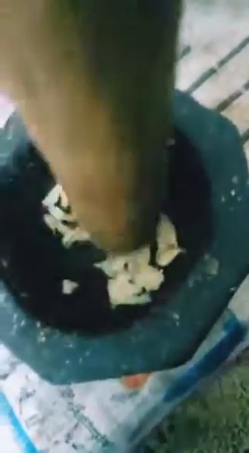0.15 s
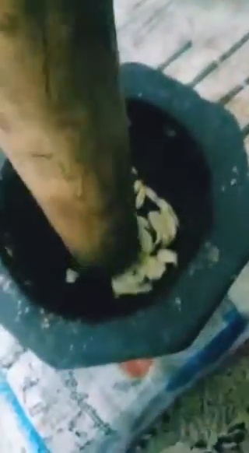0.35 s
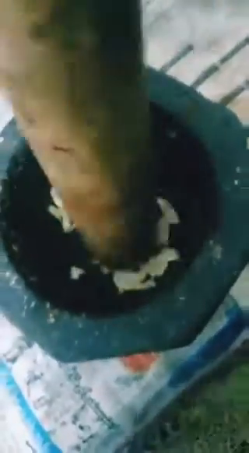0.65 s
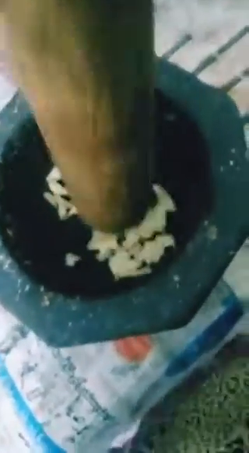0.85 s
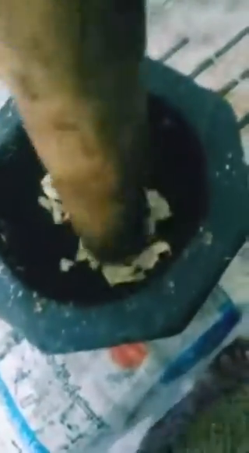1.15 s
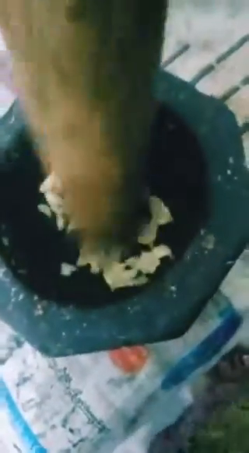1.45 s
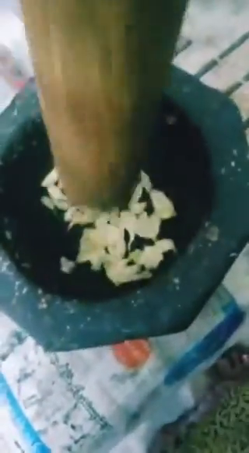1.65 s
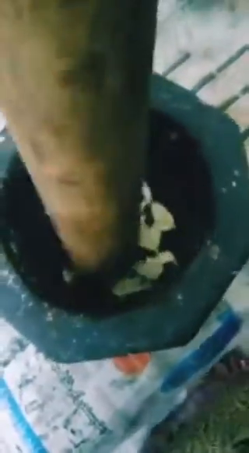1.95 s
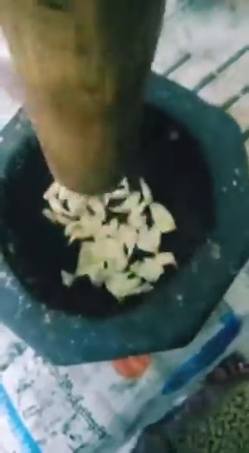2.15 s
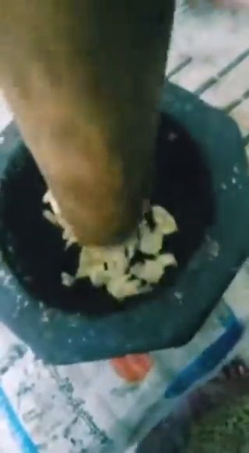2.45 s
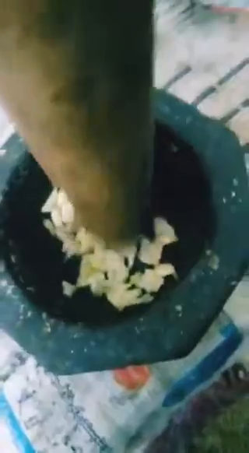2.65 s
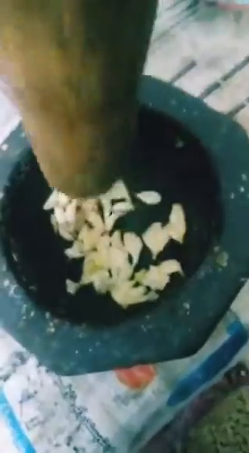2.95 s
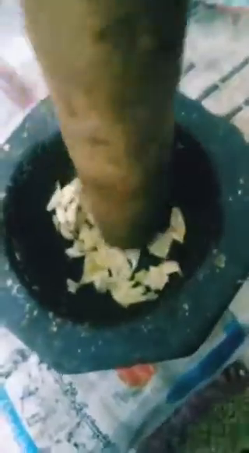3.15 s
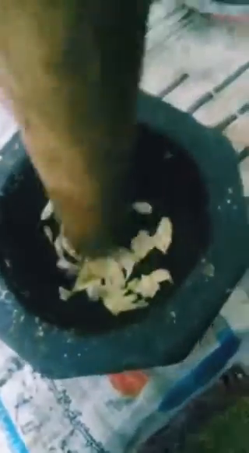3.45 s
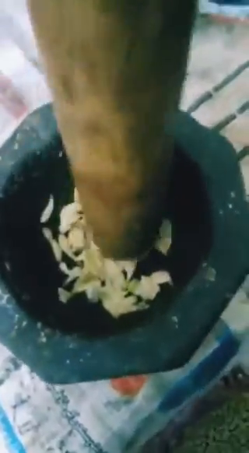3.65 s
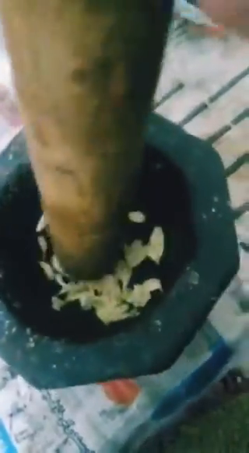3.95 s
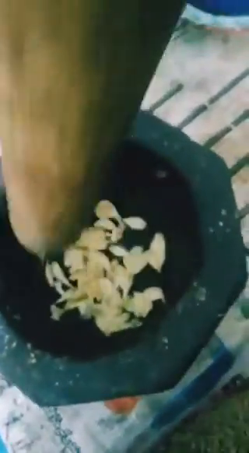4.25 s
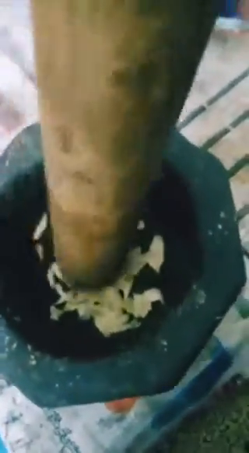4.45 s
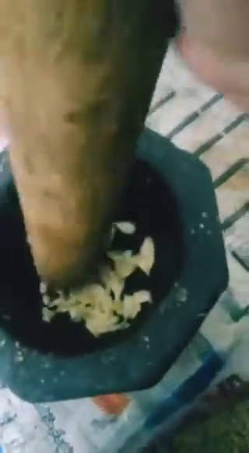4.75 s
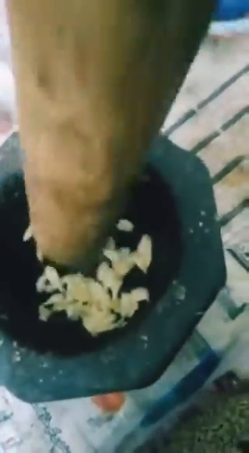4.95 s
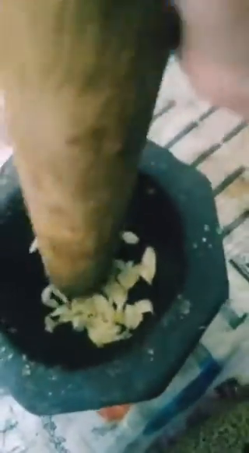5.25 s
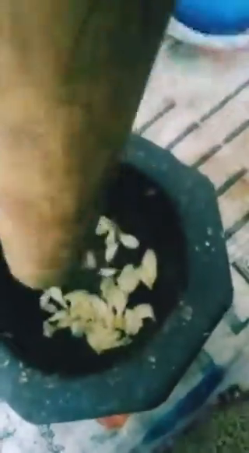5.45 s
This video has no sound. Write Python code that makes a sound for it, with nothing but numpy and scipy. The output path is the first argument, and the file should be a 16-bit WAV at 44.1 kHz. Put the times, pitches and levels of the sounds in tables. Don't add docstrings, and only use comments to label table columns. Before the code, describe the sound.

Steady low thumps of wood crushing garlic in a heavy stone bowl, with rumbling floor, faint metal ringing and soft pan hiss.

```python
import sys
import numpy as np
from scipy import signal
from scipy.io import wavfile
from scipy.ndimage import uniform_filter1d, minimum_filter1d

SR = 44100
rng = np.random.default_rng(int(sys.argv[2]) if len(sys.argv) > 2 else 0)


def voltage_ratio(decibels):
    exponent = np.asarray(decibels, float) / 20
    return 10 ** exponent


def unload_wav(signal):
    wavfile.write(
        sys.argv[1],
        SR,
        np.round(np.clip(np.atleast_2d(signal).T, -1, 1) * 32767).astype(np.int16),
    )


N = 246519

# t/s, thud peak level/dB, crunch level/dB, contact level/dB, rumble
# level/dB
PESTLE_BLOWS = [
    (-.05, -14, -40, -40, -24),
    (1.988, -26, -36, -70, -25),
                (0.359, -17.5, -16, -36, -28.5), (0.77, -13, -22, -31, -26), (1.184, -17, -15, -26, -28),
         (1.575, -25, -21, -32, -26.5), (2.398, -9.5, -14, -21, -23), (2.817, -9.5, -10, -17, -21),
         (3.22, -32, -12.5, -29.5, -39), (3.634, -19, -19, -20.5, -24.5), (4.046, -16, -14, -20.5, -23.5),
         (4.465, -10, -14, -18.5, -22), (4.882, -10, -15.5, -17.5, -22), (5.288, -16.5, -16, -22, -25)]
# t/s, peak level/dB
BARE_KNOCK = (1.9896, -.6)
# f/Hz, level/dB, t60/s
PESTLE_MODES = [(895, 0, .09), (975, -4.5, .09), (1500, -4, .014), (2000, -2, .014), (2500, -6, .01)]
# f/Hz, width/Hz, level/dB
SLAT_MODES = [(252, 28, -6.5), (354, 48, 5), (415, 37, 4.5), (425, 30, -26.5), (744, 14, -36)]
# f/Hz, level/dB per Hz
RUMBLE_SPECTRUM = [(24, -65), (40, -33.5), (223, 6.5), (369, -3), (437, 1), (516, 0), (664, -2.5), (753, 0),
                   (1050, -8), (2020, -11), (2240, -11.5), (3950, -22), (6000, -24), (7800, -52),
                   (13200, -120)]
# f/Hz, t60/s
KITCHEN_DECAY = [(100, 0.66), (300, 0.8), (600, 0.65), (1200, 0.78), (3000, 0.97), (8000, 0.71)]
# f/Hz, likeness/1
RUMBLE_SAME = [(60, .97), (150, 0.97), (450, 0.82), (950, 0.13), (2380, 0.01), (5980, 0.03), (15000, 0.44)]
# f/Hz, level/dB
RUMBLE_LEAN = [(60, 3), (180, -0.5), (550, 2.5), (1650, 4), (4970, -2), (15000, -20)]
# t/s, f/Hz, level/dB
LOOSE_SLAT = [(0, 439, -23), (0.401, 415, -25), (.8, 415, -27.5), (1.221, 415, -24), (1.599, 415, -19),
              (2.439, 453, -21.5), (3.67, 415, -23.5), (4.08, 387, -23.5), (4.499, 415, -27),
              (5.319, 415, -35)]
# t/s, peak level/dB, t60/s
RUSTLES = [(0.5311, -21, 0.32), (1.035, -23, 0.39), (1.4456, -35, 0.23), (3.0705, -23, 0.18)]
# t/s, held/s, level/dB
DISH_SPELLS = [(0.54, .03, -39), (0.84, 0.07, -31), (1.455, .012, -32.5), (1.61, 0.028, -34),
               (1.69, 0.035, -32.5), (2.09, 0.045, -36), (2.17, .19, -27.5), (3.065, 0.052, -35),
               (3.17, .13, -33.5), (3.461, 0.043, -27.5), (3.72, .012, -31), (3.905, 0.058, -32),
               (4.685, .012, -30)]
# t/s, swell level/dB
PAN_SWELL = [(0.0, -0.5), (0.4, 0), (0.95, -1), (1.4, -0.7), (1.66, 3), (1.93, -2), (2.05, -2), (2.17, 1),
             (2.38, 4.5), (2.62, -1), (2.84, -0.4), (3.45, 3), (3.6, 2), (3.75, -0.5), (4.55, 0.3),
             (4.74, 1), (4.92, 0.1), (5.59, -1)]
# f/Hz, level/dB per Hz
HISS_SPECTRUM = [(18, -65), (30, -46), (76, -30), (135, -10.5), (223, -22), (298, -9), (368, -10),
                 (713, -10), (772, -6), (1530, -7.5), (4180, -2.5), (7670, -11), (11700, -13), (15200, -6),
                 (16500, -21.5)]
# f/Hz, likeness/1
HISS_SAME = [(60, 0.93), (150, 1), (380, 1), (950, -0.033), (2380, 0.046), (11000, -0.021), (15000, 0.56)]
# f/Hz, level/dB
HISS_LEAN = [(60, 3), (99, -2), (160, 0), (270, 0.0), (450, -1.5), (740, 1.5), (1220, 4), (2010, 2.5),
             (3330, -3), (5500, -5), (9080, -11.5), (15000, -6.5)]
# f/Hz, width/Hz, level/dB
PORT = (15350, 1200, -9)

SQUARE_HZ, GLANCING_HZ = 232, 340
SQUARE_RISE_S, GLANCING_RISE_S = 0.0058, 0.055
GLANCING_DB, GLANCING_SPAN_DB = -19, 1
DISH_HZ, DISH_RISE_S, DISH_FADE_DB_PER_S = 2586, 0.048, -260
HISS_DB, HISS_FOLLOW = 18.0, 1
SIZZLE_DB, SIZZLE_FOLLOW = 15.5, 1.27
LIMIT_DB, RECOVER_DB_PER_S = -14, 153
EDGE_HZ = 15880


def blows():
    out = np.zeros((2, N))
    for s, thud_db, crunch_db, contact_db, rumble_db in PESTLE_BLOWS:
        glance = 1 / (2.5 + np.exp((thud_db - GLANCING_DB) / GLANCING_SPAN_DB))
        thud_hz = SQUARE_HZ + glance * (GLANCING_HZ - SQUARE_HZ)
        rise_s = SQUARE_RISE_S + glance * (GLANCING_RISE_S - SQUARE_RISE_S)
        add(out, s - .020, crunch(crunch_db + 7.5))
        add(out, s - .001, contact(contact_db + 8.0))
        add(out, s, thud(thud_db + 2.5, thud_hz))
        add(out, s + 0.0055, rumble(rumble_db, rise_s))
    knock_s, knock_db = BARE_KNOCK
    add(out, knock_s, knock(knock_db))
    return out


def crunch(db):
    t = np.arange(-.02, .01, 1 / SR)
    shape = np.where(t < 0, np.exp(t / .0022), np.exp(-t / .0008))
    crackle = uniform_filter1d(rng.exponential(1, len(t)), size=12)
    noise = rng.standard_normal((2, len(t))) * crackle
    band = signal.butter(2, [1100, 12500], "bandpass", fs=SR, output="sos")
    burst = shape * signal.sosfilt(band, noise)
    return voltage_ratio(db) * voltage_ratio([[-3], [1.5]]) * burst / abs(burst).max()


def contact(db):
    t = np.arange(0, .03, 1 / SR)
    touch = 0.6 * ring(804, 0.015, t, 0.00041)
    late = np.maximum(t - .0125, 0)
    echo = sum(ring(hz * rng.uniform(0.976, 1.2), 0.017, late, 0.001) for hz in (760, 1530, 1904, 2600))
    return voltage_ratio(db) * (touch + voltage_ratio([[-1.5], [-5]]) * echo)


def thud(db, hz):
    t = np.arange(0, .04, 1 / SR) - .0052
    swing = np.exp(-(t / np.where(t < 0, .0017, .004)) ** 2)
    push = swing * np.cos(2 * np.pi * 1.2 * hz * (t - .0008))
    return voltage_ratio(db) * np.array([push, push])


def rumble(db, rise_s):
    pushes = rng.random((2, SR)) < 6000 / SR
    taps = rng.standard_normal((2, SR)) * pushes
    hz, t, z = pair(taps[0], taps[1], RUMBLE_SAME, RUMBLE_LEAN, size=1024)
    slats = voltage_ratio(read(RUMBLE_SPECTRUM, hz)) + sum(hump(hz, *mode) for mode in SLAT_MODES)
    decay = voltage_ratio(-60 * t / read(KITCHEN_DECAY, hz))
    tail = back(z * slats * decay, size=1024)[:, :SR]
    t = np.arange(SR) / SR
    far_wall = voltage_ratio(2.46 * np.exp(-((t - .075) / 0.044) ** 2))
    return voltage_ratio(db + 27.0) * tail * far_wall * (1 - np.exp(-(t / rise_s) ** 2))


def knock(db):
    t = np.arange(0, .08, 1 / SR)
    tone = sum(voltage_ratio(mode_db) * ring(hz, t60, t, .0004) for hz, mode_db, t60 in PESTLE_MODES)
    tone = -voltage_ratio(db) * tone / abs(tone).max()
    hz, t, z = pair(*rng.standard_normal((2, SR)), RUMBLE_SAME, RUMBLE_LEAN, size=1024)
    note = hump(hz, 950, 110, 1) + hump(hz, 990, 100, -2.7) + hump(hz, 920, 95, 0.5) + hump(hz, 787, 50, 0)
    room = back(z * note * voltage_ratio(-3.5 - 60 * t / 0.92), size=1024)[:, :SR]
    out = room * np.minimum(np.arange(SR) / SR / 0.007, 1)
    add(out, 0, np.array([np.roll(tone, 12), voltage_ratio(-1.5) * tone]))
    return out


def slat():
    out, t = np.zeros((2, N)), np.arange(SR // 2) / SR
    for s, hz, db in LOOSE_SLAT:
        shaking = rng.standard_normal(len(t) + 3000)
        note = signal.oaconvolve(shaking, ring(hz, 0.29, t[:3000], 0.0099), "valid")
        waver = evened(note[:len(t)])
        fade = voltage_ratio(db - 60 * t / 0.57) * (1 - np.exp(-t / 0.051))
        add(out, s, voltage_ratio([[.7], [-.7]]) * waver * fade)
    return out


def rustles():
    out, t = np.zeros((2, N)), np.arange(0, .2, 1 / SR)
    band = signal.butter(2, [1900, 3900], "bandpass", fs=SR, output="sos")
    for s, db, t60 in RUSTLES:
        grains = rng.standard_normal((2, len(t))) * (rng.random(len(t)) < 1500 / SR)
        add(out, s, voltage_ratio(db - 3.0 - 60 * t / t60) * evened(signal.sosfilt(band, grains)))
    return out


def dish():
    nudges = rng.standard_normal((3, N)) * (rng.random(N) < 400 / SR)
    at_ports = nudges[:1] + .8 * nudges[1:]
    mode = ring(DISH_HZ, .1, np.arange(8000) / SR, .002)
    tone = signal.oaconvolve(at_ports, mode[None])[:, :N]
    loud = np.sqrt(uniform_filter1d(tone ** 2, size=2500) + .3)
    level = sum(spell(*row) for row in DISH_SPELLS)
    throb = .65 + .35 * np.cos(2 * np.pi * 27 * np.arange(N) / SR)
    return uniform_filter1d(level, size=400) * throb * tone / loud


def spell(start, held, db):
    t = np.arange(N) / SR - start
    rise = np.clip(1 + t / DISH_RISE_S, 0, 1) ** 2
    return rise * voltage_ratio(db + DISH_FADE_DB_PER_S * np.maximum(t - held, 0))


def hiss():
    hz, t, z = pair(*rng.standard_normal((2, N + 1024)), HISS_SAME, HISS_LEAN, size=1024)
    drift = uniform_filter1d(rng.standard_normal(z.shape[1:]), 20, 0)
    patches = evened(uniform_filter1d(drift, 8, 1))
    flicker = evened(uniform_filter1d(rng.standard_normal(len(t)), 5)) * (hz > 1800) * 1.05
    swell_db = np.interp(t, *np.transpose(PAN_SWELL))
    colour = voltage_ratio(read(HISS_SPECTRUM, hz)) + hump(hz, *PORT) + hump(hz, 1973, 130, -13.5)
    wide = colour * voltage_ratio(HISS_DB + HISS_FOLLOW * swell_db)
    sizzle = hump(hz, 4020, 1700, SIZZLE_DB + SIZZLE_FOLLOW * swell_db)
    gain = np.hypot(wide, sizzle) * voltage_ratio(1.3 * patches + flicker)
    return voltage_ratio(-38.5) * back(z * gain, size=1024)[:, :N]


def ring(hz, t60, t, rise):
    return voltage_ratio(-60 * t / t60) * (1 - np.exp(-t / rise)) * np.sin(2 * np.pi * hz * t)


def hump(hz, centre_hz, width, db):
    return voltage_ratio(db) / (1 + (2 * (hz - centre_hz) / width) ** 2)


def evened(x):
    return x / np.sqrt(np.mean(x ** 2) + 1e-20)


def read(points, hz):
    f, value = np.transpose(points)
    return np.interp(np.log(hz + 1), np.log(f + 1), value)


def pair(a, b, same, lean, size):
    hz, t, za = signal.stft(a, SR, nperseg=size, noverlap=size * 3 // 4)
    zb = signal.stft(b, SR, nperseg=size, noverlap=size * 3 // 4)[2]
    like = np.clip(read(same, hz), -1, 1)[:, None]
    tilt = voltage_ratio(read(lean, hz) / 2)[:, None]
    left = za * tilt
    right = (like * za + np.sqrt(1 - like ** 2) * zb) / tilt
    return hz[:, None], t, np.array([left, right])


def back(z, size):
    return signal.istft(z, SR, nperseg=size, noverlap=size * 3 // 4)[1]


def add(mix, s, sound):
    at = round(s * SR)
    part = mix[:, max(at, 0):max(at + sound.shape[1], 0)]
    part += sound[:, max(-at, 0):][:, :part.shape[1]]


def scene():
    return blows() + slat() + rustles() + dish() + hiss()


def limiter(x):
    power_db = 10 * np.log10(abs(uniform_filter1d((x ** 2).mean(0), size=200)) + 1e-12)
    held_db = -minimum_filter1d(-power_db, size=1700, origin=849)
    fall = np.arange(N) * RECOVER_DB_PER_S / SR
    over_db = np.maximum(np.maximum.accumulate(held_db + fall) - fall - LIMIT_DB, 0)
    late_db = np.roll(uniform_filter1d(over_db, size=200), 330)
    return x / voltage_ratio(late_db)


def gate(x, depth_db, under_db, hole_db, hole_under_db):
    hz, t, z = signal.stft(x, SR, nperseg=2048, noverlap=1536)
    near = uniform_filter1d(uniform_filter1d(abs(z) ** 2, size=3, axis=1), size=3, axis=2)
    around = np.exp(uniform_filter1d(np.log(abs(near) + 1e-20), size=40, axis=1))
    share = abs(near) / (abs(around) + 1e-20)
    patch = abs(uniform_filter1d(uniform_filter1d(share.mean(0), size=6, axis=0), size=3, axis=1))
    sink = 1 / (1 + (share / voltage_ratio(2 * under_db)) ** 3)
    hole = (hz[:, None] > 2900) / (1 + (patch / voltage_ratio(2 * hole_under_db)) ** 12)
    upper = np.clip(hz[:, None] / 600 - 2.5, 0, 1)
    return back(z * voltage_ratio((depth_db * sink + hole_db * hole) * upper), size=2048)[:, :N]


def roll_off(x):
    return signal.sosfilt(signal.butter(12, 17100, fs=SR, output="sos"), x)


def record(dry):
    cut = signal.sosfilt(signal.butter(2, 70, "highpass", fs=SR, output="sos"), dry)
    gated = gate(limiter(cut), depth_db=-12, under_db=-.6, hole_db=-28, hole_under_db=-1.3)
    edge = signal.firwin(2047, EDGE_HZ, window=("kaiser", 9), fs=SR)
    finished = signal.oaconvolve(gated, edge[None], "same")
    return roll_off(finished)


dry = scene()
out = record(dry)
unload_wav(out)
```